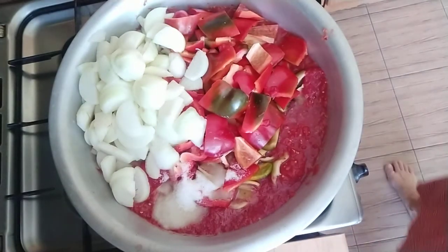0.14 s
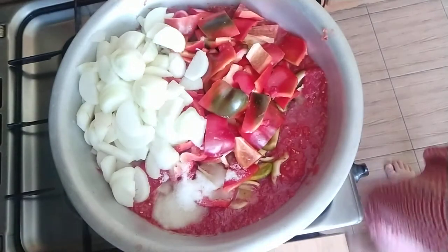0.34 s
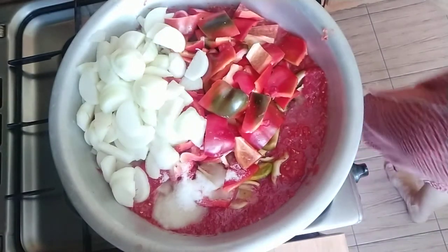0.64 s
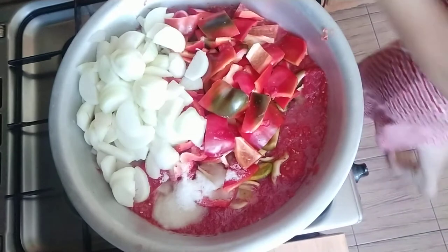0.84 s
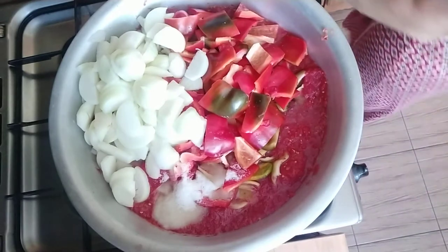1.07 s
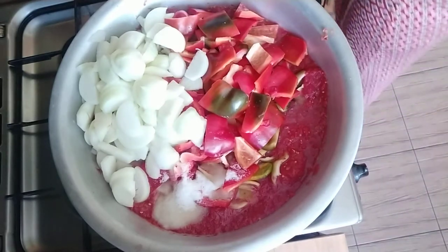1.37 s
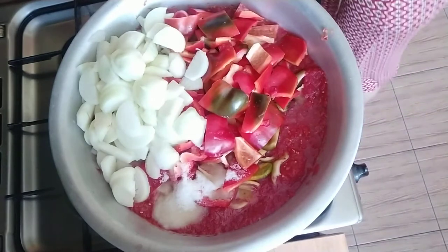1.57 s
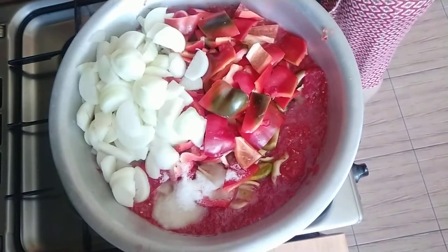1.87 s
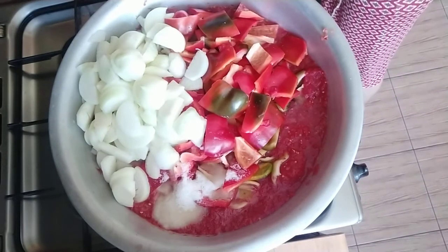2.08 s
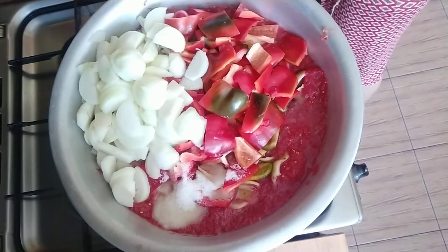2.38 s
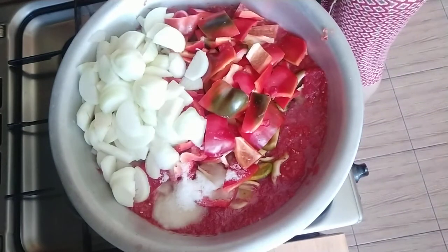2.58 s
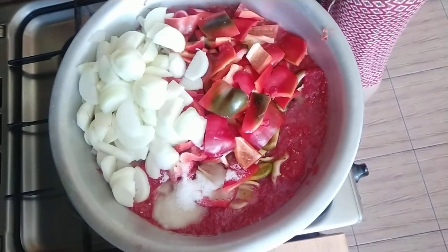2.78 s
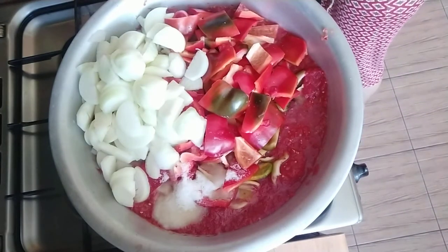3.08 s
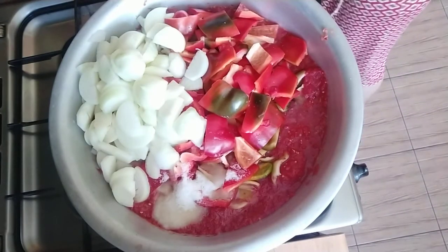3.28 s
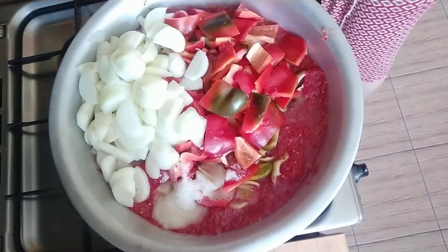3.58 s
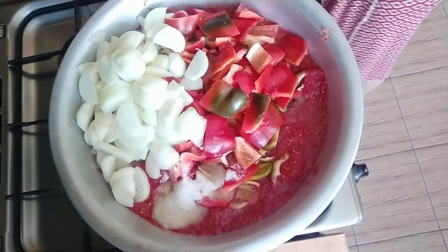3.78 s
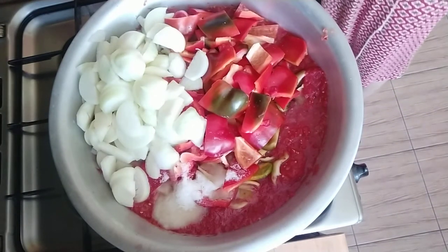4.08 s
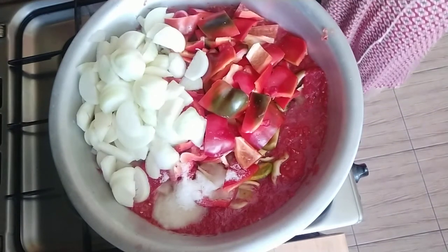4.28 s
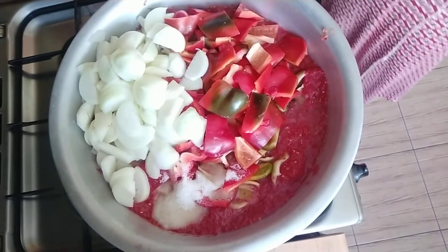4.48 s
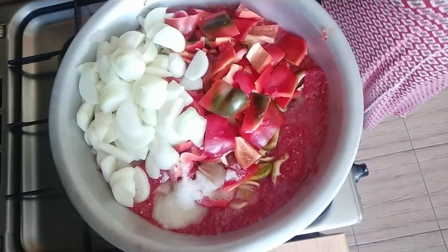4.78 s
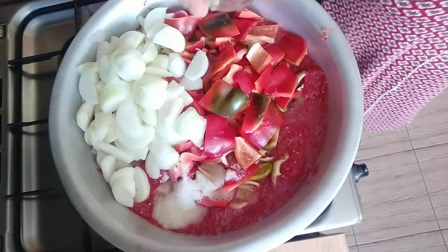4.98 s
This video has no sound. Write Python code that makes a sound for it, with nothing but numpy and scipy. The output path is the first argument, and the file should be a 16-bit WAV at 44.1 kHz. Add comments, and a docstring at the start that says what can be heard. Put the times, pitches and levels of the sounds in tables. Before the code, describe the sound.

Close stereo pickup in a small kitchen with quiet low room noise. Clothes rustle briefly, then a firm wooden knock lands and settles with weaker taps. A short swish, lighter knock, faint squeak and crisp snap follow. A bright quick glass-on-dish clink sounds past the middle, then more rustling and two deep hollow pot bumps near the end.

```python
"""Things put down in a small kitchen: dull knocks on wood, a bright double clink of a glass against a dish
and two hollow bumps of a pot, each made of force pulses that ring damped modes, plus noise bursts.
A swish and a crisp snap are swells of grainy noise; soft nudges ring a panel; a faint squeak is a narrow band.
Clothes rustle as bright noise that follows the speed of each rub, over a low room noise with narrow resonances.
A diffuse noise tail gives the handled things the reverberation of the room."""
import sys
import numpy as np
from scipy import signal
from scipy.fft import rfft, irfft, next_fast_len
from scipy.io import wavfile

SR = 44100
rng = np.random.default_rng(int(sys.argv[2]) if len(sys.argv) > 2 else 0)


def transcribe(signal):
    """Save signal, clipped to [-1, 1], as a 16-bit WAV file at the path in sys.argv[1]."""
    frames = np.atleast_2d(signal).T
    limited = np.clip(frames, -1, 1)
    pcm = np.round(limited * 32767).astype(np.int16)
    wavfile.write(sys.argv[1], SR, pcm)


N = 226537
TIME = np.arange(N) / SR   # s

# hollow bumps of a pot: start_s, boom_db, crack_db, rim_ring_db, contact_brightness_hz
BUMPS = [(4.6241, -9.5, -3, -8.5, 5040), (4.8727, -6, -11.5, -3, 2800)]


def from_db(db):
    """Level to amplitude: 20 dB is a factor of ten."""
    return 10 ** (np.asarray(db) / 20)


def rms_one(x):
    """Normalise the effective value (rms) to 1."""
    return x / np.sqrt(np.mean(x ** 2) + 1e-20)


def at_hz(points, hz):
    """Interpolate a table on a logarithmic frequency axis, as pitch is heard."""
    table = np.array(points)
    return np.interp(np.log(hz + 1), np.log(table[:, 0]), table[:, 1])


def fade(t60):
    """Exponential decay over one second: the level falls 60 dB in t60 seconds."""
    return np.exp(-np.log(1000) * TIME[:SR] / t60)


def through(x, response):
    """Linear superposition: convolve a signal with an impulse response."""
    return signal.fftconvolve(np.atleast_2d(x), np.atleast_2d(response), axes=1)[:, :N]


def butter(x, hz, kind, order=2):
    """Causal Butterworth filter: a passband without ripple."""
    sections = signal.butter(order, np.minimum(hz, SR / 2 - 1), kind, fs=SR, output="sos")
    return signal.sosfilt(sections, x + 1e-18)


def noise(spectrum, count=N):
    """Coloured stereo noise of rms 1; the mix of sum and difference sets the left-right coherence."""
    # likeness of the two sides: frequency_hz, correlation
    likeness = [(50, .6), (200, 0), (350, 0.83), (700, 0.3), (1400, 0), (15000, 0.0099)]
    size = next_fast_len(count)
    hz = np.arange(size // 2 + 1) * SR / size
    mid, side = rfft(rng.standard_normal((2, size)))
    alike = np.clip(at_hz(likeness, hz), -1, 1)
    both = np.sqrt(1 + alike) * mid + np.sqrt(1 - alike) * side * [[1], [-1]]
    coloured = both * from_db(at_hz(spectrum, hz))
    return rms_one(irfft(coloured, size)[:, :count])


def flicker(per_s, depth_db):
    """Random amplitude modulation of rms 1: a level that wanders between random steps."""
    steps = rng.standard_normal(N)
    wander = np.interp(TIME * per_s, np.arange(N), steps)
    return rms_one(from_db(depth_db * wander))


def contacts(rows):
    """Contact mechanics: one force pulse per touch; a lower brightness makes it longer and duller."""
    force = np.zeros(N)
    for s, db, bright_hz in rows:
        click = np.zeros(N)
        click[round(s * SR)] = from_db(db)
        force += butter(click, bright_hz, "low")
    return force


def ringing(modes):
    """Modal synthesis: the impulse response is a sum of damped sines, here of alternating sign."""
    response = 0
    for k, (hz, db, t60) in enumerate(modes):
        mode = np.sin(2 * np.pi * hz * TIME[:SR]) * fade(t60)
        response = response + (-1) ** k * from_db(db) * mode
    return response


def cracks(rows, spectrum, db, t60):
    """High modal density: countless quickly damped modes merge into a noise burst, new at every touch."""
    out = np.zeros((2, N + SR))
    for s, strength_db, bright_hz in rows:
        burst = noise(spectrum, count=SR // 4) * fade(t60)[:SR // 4]
        burst = butter(burst, bright_hz, "low")
        at = round(s * SR)
        out[:, at:at + burst.shape[1]] += from_db(db + strength_db) * burst
    return out[:, :N]


def place(x, pan_db, lag_ms):
    """Level and arrival-time differences: positive pan is louder left, positive lag reaches left later."""
    left, right = np.broadcast_to(x, (2, N))
    late = lag_ms / 1000   # s
    left = np.interp(TIME - max(late, 0), TIME, left)
    right = np.interp(TIME + min(late, 0), TIME, right)
    return np.array([from_db(pan_db / 2) * left, from_db(-pan_db / 2) * right])


def kitchen(build_s=0.005):
    """Diffuse reverberation: a noise tail that builds up quickly and whose bass lasts longest."""
    # reverberation time: frequency_hz, t60_s
    room_t60 = [(150, 0.6), (500, 0.45), (1000, 0.31), (4000, 0.41), (8000, 0.37), (14000, 0.23)]
    spectrum = rfft(noise([(100, 0), (10000, 0)], count=SR))   # flat
    hz = np.arange(SR // 2 + 1)
    edges = np.geomspace(140, SR / 2, 15)   # band limits, Hz
    build_up = 1 - np.exp(-TIME[:SR] / build_s)
    tail = 0
    for low, high in zip(edges, edges[1:]):
        band = irfft(spectrum * ((hz >= low) & (hz < high)), SR)
        band = band * fade(at_hz(room_t60, np.sqrt(low * high))) * build_up
        # band energy in proportion to its width
        tail = tail + rms_one(band) * np.sqrt(2 * (high - low)) / SR
    return tail


def room_noise(half_width_hz=9):
    """Stationary broadband noise, with a few narrow room resonances in it."""
    # rush: frequency_hz, level_db (per Hz, relative)
    air = [(15, -68), (25, -31), (91, -32.5), (107, -41.5), (170, -9), (248, -3), (342, -4.5), (542, -11.5),
           (769, -8), (981, -14), (1320, -21), (1980, -18), (3130, -22.5), (14600, -33), (15800, -29.5)]
    # low resonances: frequency_hz, rms_db
    drones = [(150, -71), (195, -62.5), (344, -63)]
    sound = from_db(-53.5) * noise(air)
    for hz, db in drones:
        band_hz = [hz - half_width_hz, hz + half_width_hz]
        sound = sound + from_db(db) * rms_one(butter(rng.standard_normal(N), band_hz, "band"))
    return sound


def rub_speed(start, length, peak_at=0.33):
    """Kinematics of one move: 0 to 1 and back, fastest at a share peak_at of its length."""
    progress = np.interp(TIME, [start, start + peak_at * length, start + length], [0, .5, 1])
    return np.abs(np.sin(np.pi * progress))


def clothes(rest_db=-60, speed_power=1.4):
    """Friction noise: cloth on cloth gives a fine, bright hiss whose amplitude is a power of rub speed."""
    # cloth hiss: frequency_hz, level_db (per Hz, relative)
    cloth_spectrum = [(1470, -28), (2500, -6), (2960, -13.5), (3590, -9), (4320, -6.5), (8790, 1),
                      (15100, 0), (15800, -1.5)]
    # moves: start_s, length_s, peak_db
    rubs = [(0.18, 0.097, -51.5), (0.543, 0.093, -58), (0.628, 0.13, -46.5), (0.795, 0.12, -54.5),
            (0.969, 0.16, -44), (1.124, 0.19, -42), (1.59, 0.32, -58.5), (2.44, 0.11, -56.5),
            (2.945, 0.13, -54), (3.004, 0.12, -50), (3.539, 0.19, -49), (3.65, 0.28, -59),
            (4.053, 0.23, -47.5), (4.172, .12, -47), (4.264, 0.26, -50), (4.47, 0.21, -49.5),
            (4.59, 0.19, -50), (4.732, .27, -44.5), (4.992, 0.14, -40.5)]
    power = from_db(rest_db) ** 2   # cloth never lies quite still
    for start, length, db in rubs:
        power = power + (from_db(db) * rub_speed(start, length) ** speed_power) ** 2
    rustle = np.sqrt(power) * noise(cloth_spectrum) * flicker(per_s=930, depth_db=1.0)
    return place(rustle, pan_db=-1.0, lag_ms=0)


def squeak(hz=1980, half_width_hz=14):
    """Friction-driven resonance: something sliding feeds one narrow band, a faint thin squeak."""
    # course of its level: time_s, level_db
    level_points = [(2.2, -85), (2.3, -86), (2.42, -51.5), (2.55, -70), (2.72, -65), (2.85, -95)]
    s, db = np.transpose(level_points)
    band_hz = [hz - half_width_hz, hz + half_width_hz]
    tone = rms_one(butter(rng.standard_normal((2, N)), band_hz, "band"))
    return from_db(np.interp(TIME, s, db)) * tone


def nudges(room):
    """Long contact pulses: padded touches wake only the low modes of a hollow panel."""
    # touches: start_s, strength_db, contact_brightness_hz
    touches = [(1.215, -15, 500), (1.222, 4.5, 496), (1.260, -4.5, 600), (1.293, -5, 500)]
    # panel modes: frequency_hz, level_db, t60_s
    panel = [(91, -64, 0.072), (363, -35.5, 0.063), (410, -41.5, 0.038)]
    sound = through(contacts(touches), ringing(panel))
    return sound + from_db(-7) * through(sound, room)


def snaps(room):
    """Amplitude-modulated noise: something thin slides and snaps, grainy hiss over a duller crunch."""
    # swishes, scuffs and snaps: peak_time_s, hiss_db, crunch_db, rise_s, fall_s
    swells = [(2.235, -32.5, -62, 0.014, 0.018), (2.2495, -30, -53, 0.0025, 0.0084),
              (2.56, -56, -57.5, 0.28, 0.27), (2.694, -57, -48, 0.0063, 0.041),
              (2.7369, -41, -26.5, 0.0014, 0.003), (2.742, -20, -35.5, 0.0018, 0.0043),
              (2.790, -57, -42.5, .015, 0.0098), (3.59, -68, -52, 0.041, 0.033),
              (3.897, -70, -51, 0.015, 0.022)]
    # spectra: frequency_hz, level_db (per Hz, relative)
    hiss_spectrum = [(1500, -21), (4000, -13), (7000, -8), (12000, -2), (15500, 0)]
    crunch_spectrum = [(150, -7.5), (600, -4), (1700, 5), (3200, 2), (6000, -5.5), (12000, -7)]
    hiss, crunch = 0, 0
    for s, hiss_db, crunch_db, rise, fall in swells:
        # Gaussian rise, exponential fall
        swell = np.exp(-(np.minimum(TIME - s, 0) / rise) ** 2 - np.maximum(TIME - s, 0) / fall)
        hiss = hiss + from_db(hiss_db) * swell
        crunch = crunch + from_db(crunch_db) * swell
    sound = hiss * noise(hiss_spectrum) + crunch * noise(crunch_spectrum)
    sound = sound * flicker(per_s=450, depth_db=1.0)
    return place(sound, pan_db=1.0, lag_ms=0) + from_db(-8.5) * through(sound, room)


def thumps(contact_hz=400):
    """Compliance of the support: the top gives under the landing pot, a short, deep push."""
    # the top under the pot: frequency_hz, level_db, t60_s
    top_modes = [(95, -41, .035)]
    hits = [(s, db, contact_hz) for s, db, _, _, _ in BUMPS]
    return through(contacts(hits), ringing(top_modes))


def bumps(room, boom_delay_s=0.0011, boom_hz=700, body_cut_hz=230, rim_cut_hz=420):
    """Two coupled radiators: the rim cracks first, the hollow body booms just after, on the right."""
    # modes of body, rim and tick: frequency_hz, level_db, t60_s
    body_modes = [(306.4, -10, 0.19), (420, -13, 0.029), (327.7, -20, 0.19), (525, -29, 0.096),
                  (700, -46, 0.046)]
    rim_modes = [(912, -25, 0.055), (1889, -19.5, 0.047), (2030, -37, 0.063), (3250, -19, 0.021),
                 (3620, -35, 0.075)]
    tick_modes = [(1200, -7.5, 0.011), (2050, -16, 0.012), (4080, -13.5, 0.0071)]
    # crack: frequency_hz, level_db (per Hz, relative)
    crack_spectrum = [(200, -6), (450, -1), (620, 16), (1400, -1.5), (2400, 2.5), (4200, -5), (5500, -7),
                      (7700, -9.5), (10000, -15)]
    crack_hits = [(s, db, hz) for s, _, db, _, hz in BUMPS]
    ring_hits = [(s, db, hz) for s, _, _, db, hz in BUMPS]
    boom_hits = [(s + boom_delay_s, db, boom_hz) for s, db, _, _, _ in BUMPS]
    crack = cracks(crack_hits, crack_spectrum, db=-14, t60=0.052)
    tick = through(contacts(crack_hits), ringing(tick_modes))
    ring = through(contacts(ring_hits), ringing(rim_modes))
    rim = butter(crack + tick + ring, rim_cut_hz, "high")
    boom = butter(through(contacts(boom_hits), ringing(body_modes)), body_cut_hz, "high")
    near = place(rim, pan_db=-3.5, lag_ms=.47) + place(boom, pan_db=-2.2, lag_ms=.05)
    return near + from_db(-15) * through(boom, room) + from_db(-7.5) * through(rim, room)


def clink(room, lowest_hz=1300):
    """Radiation by a small body: glass chatters on a dish with high modes and little bass."""
    # touches: start_s, strength_db, contact_brightness_hz
    touches = [(3.2709, -1.5, 4415), (3.2781, -0.5, 6500), (3.2797, -2, 14300)]
    # modes of glass and dish, then of the top under the dish: frequency_hz, level_db, t60_s
    glass_modes = [(2354, -24, 0.034), (2737, -15, 0.059), (2790, -5.5, 0.0073), (2963, -29, .08),
                   (3250, -28.5, 0.069), (3900, -34.5, .08), (3830, -36, .08), (3940, -8, 0.0053),
                   (4113, -29, 0.19), (4000, -21.5, 0.21), (4200, -32, .12), (6460, -27, .05),
                   (8760, -33.5, .09), (12600, -16.5, 0.025), (12690, -20, 0.037)]
    thud_modes = [(260, -45, 0.077)]
    # crack: frequency_hz, level_db (per Hz, relative)
    crack_spectrum = [(1400, -11.5), (2800, 0.5), (4100, 13.5), (4900, -25), (6400, -0.5), (7600, -12),
                      (9000, 4), (10800, -7), (12900, 6), (14500, -16)]
    force = contacts(touches)
    sound = through(force, ringing(glass_modes)) + cracks(touches, crack_spectrum, db=-10.0, t60=0.044)
    sound = butter(sound, lowest_hz, "high") + through(force, ringing(thud_modes))
    near = place(sound, pan_db=0, lag_ms=.055)
    return near + from_db(-6) * through(sound, room)


def knocks(room):
    """Impact and early reflection: blows on a wooden top, a little left, return from surfaces around it."""
    # things set down, rocking as they settle: start_s, strength_db, contact_brightness_hz
    blows = [(1.213, -34, 925), (1.3710, -3.5, 3470), (1.455, -19, 2010), (1.568, -25.5, 920),
             (1.583, -23.5, 2700), (1.598, -22.5, 590), (2.3694, -15.5, 4050)]
    # modes of the wooden top: frequency_hz, level_db, t60_s
    wood_modes = [(204.7, -31.5, 0.34), (254.5, -26, 0.17), (304.7, -20.5, 0.12), (389, -22, 0.09),
                  (490.7, -16.5, 0.071), (530, -37, 0.22), (714, -21, 0.074), (795, 0, 0.0098),
                  (1092, 0, 0.011), (960, -29, 0.21), (1390, -22.5, 0.041), (2080, -37, 0.089),
                  (2933, -31, .04)]
    # dense part of the knock: frequency_hz, level_db (per Hz, relative)
    crack_spectrum = [(160, -5.5), (700, 8.5), (1100, 3.5), (1550, -4.5), (2100, -1), (2550, -12),
                      (3800, -13), (6000, -10), (15000, -1.5)]
    # reflections: delay_s, level_db
    reflections = [(.0062, -22), (.0130, -10.5), (0.0209, -18)]
    sound = through(contacts(blows), ringing(wood_modes))
    sound = sound + cracks(blows, crack_spectrum, db=-8.5, t60=0.049)
    echoes = sum(from_db(db) * np.roll(sound, round(delay * SR), axis=1) for delay, db in reflections)
    near = place(sound + echoes, pan_db=4.0, lag_ms=-0.27)
    return near + from_db(-3.5) * through(sound, room)


def scene(low_cut_hz=130):
    """Superposition of sources: most handled things pass a low cut; the other layers are added whole."""
    room = kitchen()
    handled = knocks(room) + clink(room) + bumps(room) + snaps(room)
    handled = butter(handled, low_cut_hz, "high")
    return handled + thumps() + nudges(room) + squeak() + clothes() + room_noise()


def record(dry, top=0.8, cutoff_hz=15950):
    """Soft saturation rounds the highest peaks; a steep low-pass limits the bandwidth."""
    rounded = top * np.tanh(dry / top)
    low_pass = signal.ellip(12, .1, 80, cutoff_hz, fs=SR, output="sos")
    return signal.sosfilt(low_pass, rounded)


dry = scene()
out = record(dry)
transcribe(out)
```